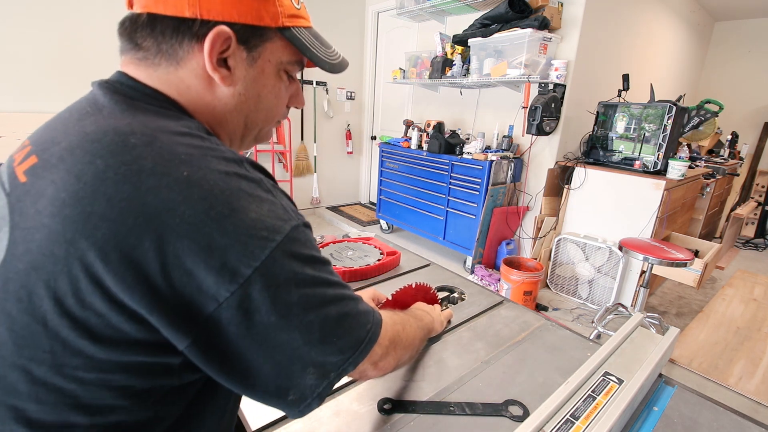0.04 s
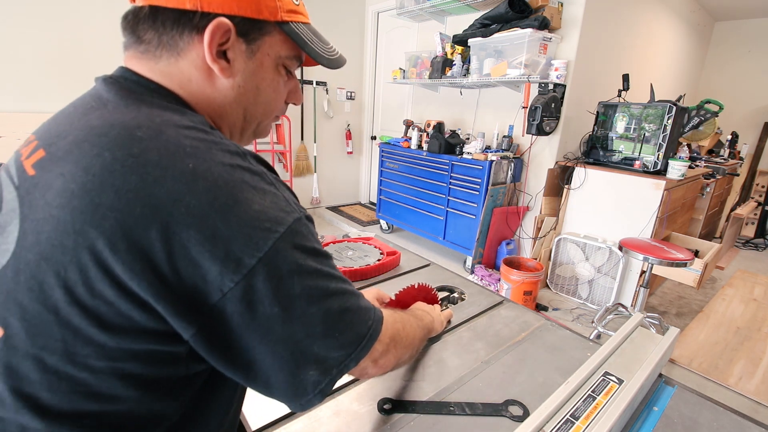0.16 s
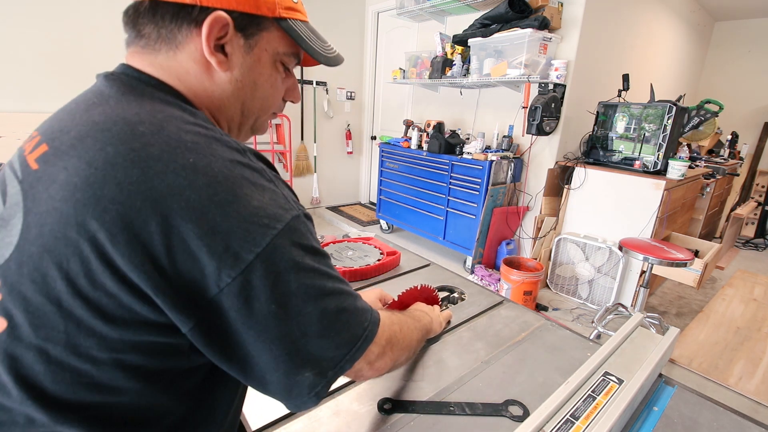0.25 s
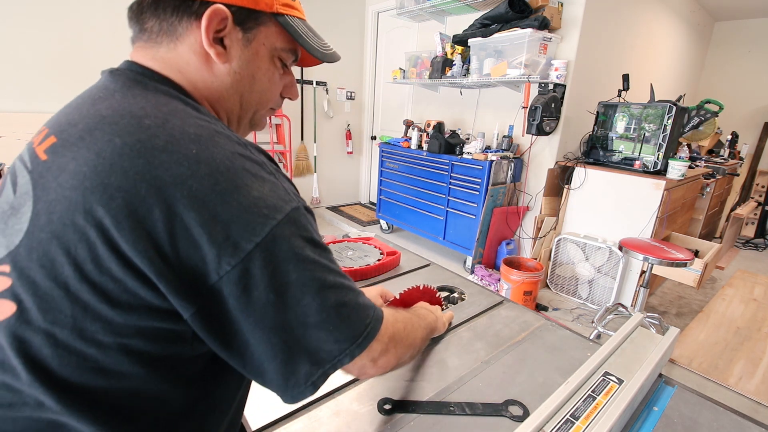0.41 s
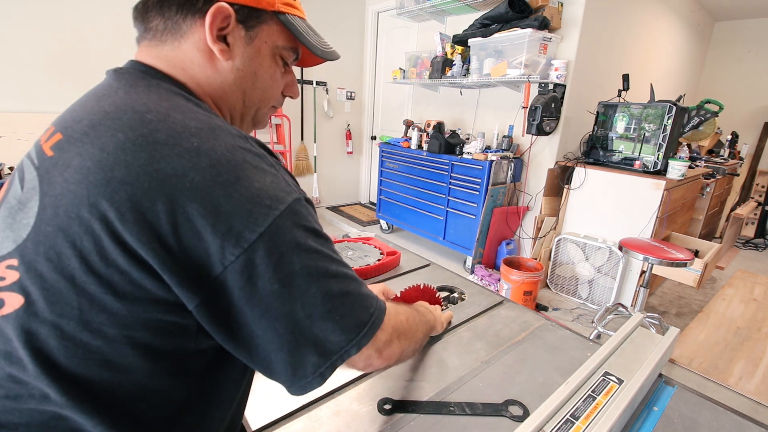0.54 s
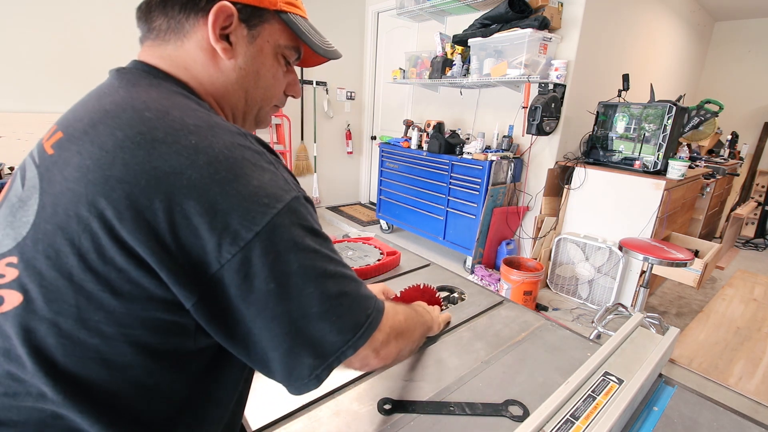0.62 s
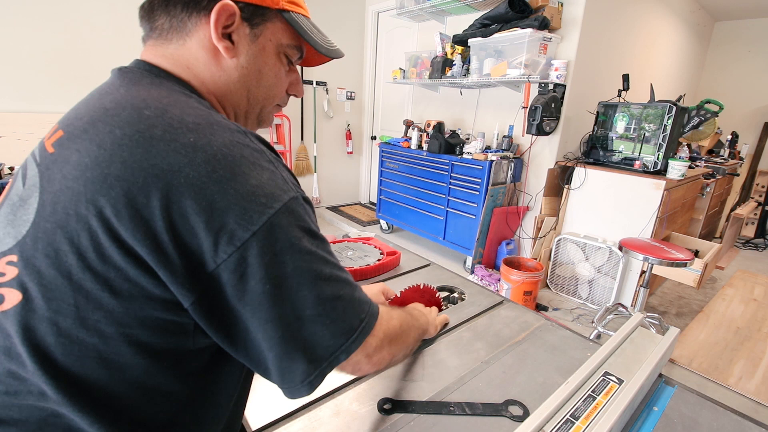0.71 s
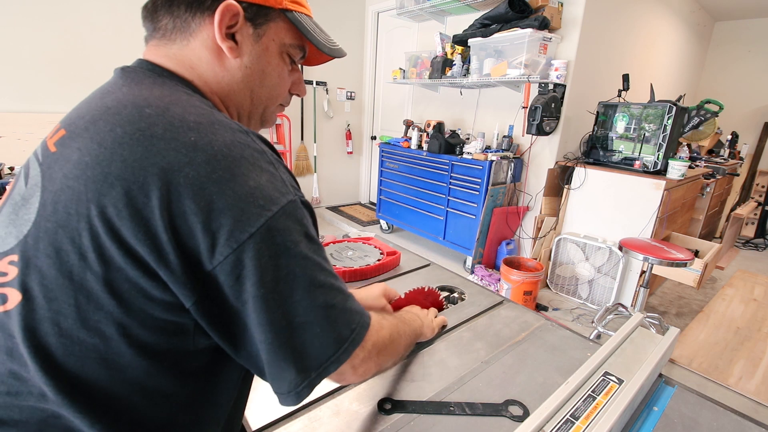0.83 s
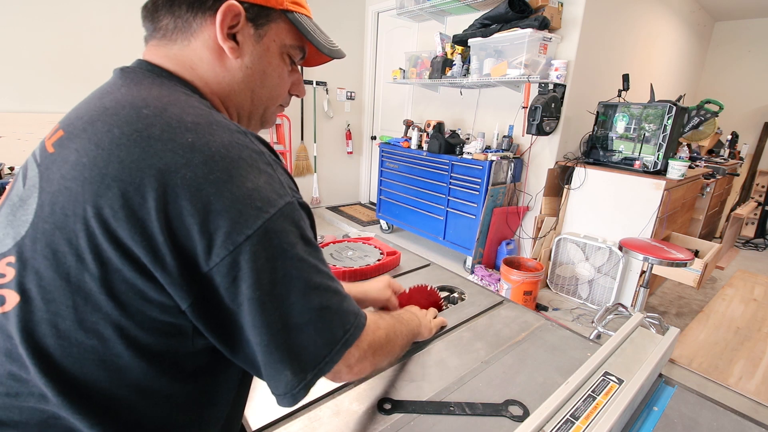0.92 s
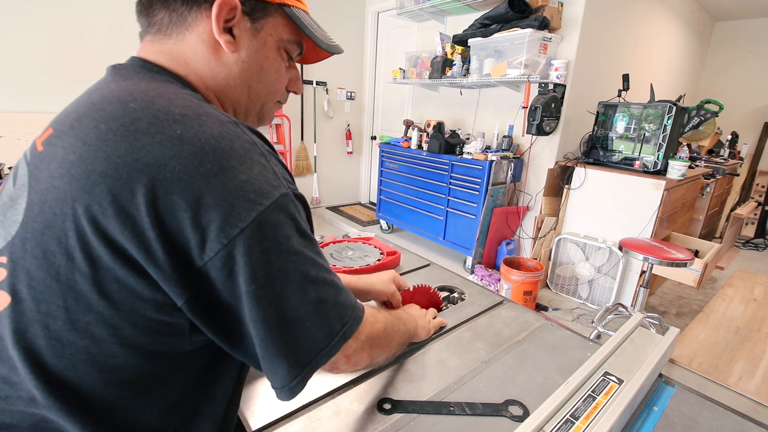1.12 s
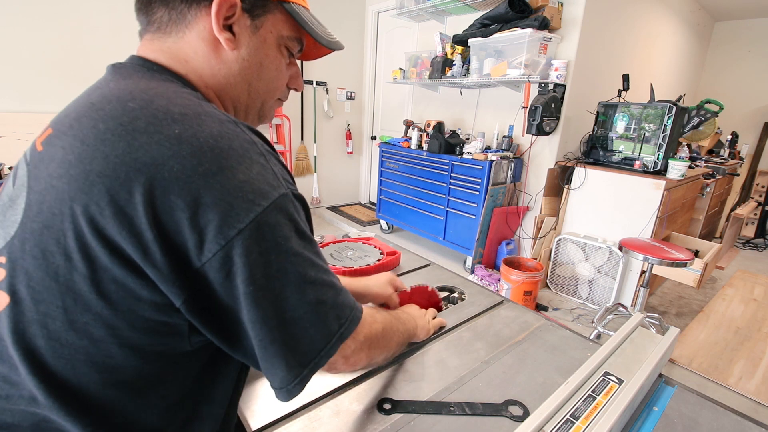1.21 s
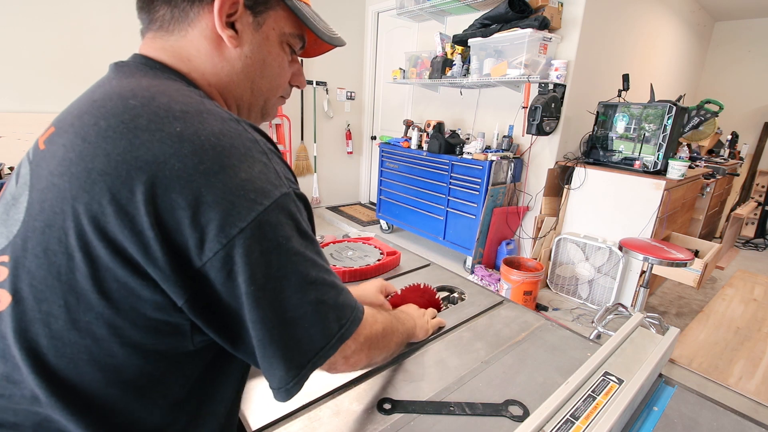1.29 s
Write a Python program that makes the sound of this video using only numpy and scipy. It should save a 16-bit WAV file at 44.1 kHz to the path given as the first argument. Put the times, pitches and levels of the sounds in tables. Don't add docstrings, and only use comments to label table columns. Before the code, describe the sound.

Metallic clank and rattle of steel blades being fitted by hand, with short rings and light scraping

```python
import sys
import numpy as np
from scipy import signal
from scipy.fft import rfft, irfft, next_fast_len
from scipy.io import wavfile
from scipy.ndimage import map_coordinates

SR = 44100
rng = np.random.default_rng(int(sys.argv[2]) if len(sys.argv) > 2 else 0)


def pcm_store(signal):
    levels = np.round(np.clip(np.atleast_2d(signal), -1, 1) * 32767)
    wavfile.write(sys.argv[1], SR, levels.astype(np.int16).T)


def level_to_linear(level):
    exponent = np.asarray(level, float) / 20
    return 10 ** exponent


N = 59535


def unit(x):
    return x / np.sqrt(np.mean(x ** 2) + 1e-20)


def along(points, hz):
    point_hz, value = np.transpose(points)
    return np.interp(np.log(hz + 1), np.log(point_hz + 1), value)


def filtered(x, response):
    size = next_fast_len(len(x) + SR // 2)
    hz = np.fft.rfftfreq(size, 1 / SR)
    return irfft(rfft(x, size) * response(hz), size)[:len(x)]


def coloured_noise(colour, size):
    return filtered(rng.standard_normal(size), lambda hz: level_to_linear(along(colour, hz)))


def wobble(rate_hz, size):
    knots = rng.standard_normal(int(size * rate_hz / SR) + 4)
    return map_coordinates(knots, [np.arange(size) * rate_hz / SR])


def garage(x):
    # (frequency [Hz], decay t60 [s])
    wall_t60 = [(100, 0.71), (500, 0.46), (2000, 0.52), (5000, 0.5), (9000, 0.46), (15000, 0.38)]
    # (frequency [Hz], level [dB])
    wall_colour = [(100, 14), (1000, 3), (5000, 1.5), (7500, -7), (15000, -5)]
    first_wall_s, build_s = .006, .015
    hz, t, spectrum = signal.stft(rng.standard_normal(SR), SR, nperseg=256)
    decay_db = along(wall_colour, hz)[:, None] - 60 * t / along(wall_t60, hz)[:, None]
    tail = signal.istft(spectrum * level_to_linear(decay_db), SR, nperseg=256)[1]
    since_s = np.clip(np.arange(len(tail)) / SR - first_wall_s, 0, None)
    tail = tail * (1 - np.exp(-since_s / build_s))
    return signal.fftconvolve(x, tail / np.linalg.norm(tail))


def contact(body, modes, ring_db, bright_db, chatter_s, rise_s):
    pivot_hz, thump_cut_hz = 2000, 120
    grit_db, scatter_db, grip_detune = 3, 1.5, .006
    soft_ring_db, hard_s = -6, .001
    t = np.arange(18000) / SR
    rise = 1 - np.exp(-t / rise_s)

    def tilt_db(hz):
        return bright_db * np.log2((hz + 50) / pivot_hz)

    noise = filtered(rng.standard_normal(len(t)), lambda f: level_to_linear(along(body, f) + tilt_db(f)))
    shape = level_to_linear(-60 * t / chatter_s) * rise
    chatter = noise * shape * level_to_linear(grit_db * np.clip(wobble(861, len(t)), -2, 2))
    chatter = chatter * np.linalg.norm(shape) / np.linalg.norm(chatter)
    chatter = filtered(chatter, lambda f: (1j * f / (thump_cut_hz + 1j * f)) ** 2)

    hz, db, t60 = np.transpose(modes)[..., None]
    strength, phase, detune = rng.standard_normal((3, len(modes), 1))
    mode_amp = level_to_linear(db + tilt_db(hz) + scatter_db * strength - 60 * t / t60)
    mode_hz = hz * (1 + grip_detune * detune)
    ring = (mode_amp * np.sin(2 * np.pi * mode_hz * t + 2 * phase)).sum(0)
    softness_db = soft_ring_db * np.log10(1 + rise_s / hard_s)
    return np.array([chatter, level_to_linear(ring_db - 17.5 + softness_db) * rise * ring])


def steel(contacts, body, modes, ring_db):
    garage_db, ring_to_walls_db = -3, -5
    out = np.zeros(N + 2 * SR)
    for s, db, *manner in contacts:
        chatter, ring = level_to_linear(db) * contact(body, modes, ring_db, *manner)
        far = level_to_linear(garage_db) * garage(chatter + level_to_linear(ring_to_walls_db) * ring)
        start = round(s * SR)
        out[start:][:len(ring)] += chatter + ring
        out[start:][:len(far)] += far
    return out[:N]


def air():
    # (frequency [Hz], level [dB/Hz])
    air_colour = [(15, -30), (25, -9), (70, -18), (134, -17), (427, -10), (796, -17), (1260, -18.5),
                  (1740, -26), (16000, -44.5)]
    level_db = -56.5
    return level_to_linear(level_db) * unit(coloured_noise(air_colour, N))


def hands():
    # (time [s], bumping level [dB], scraping level [dB])
    moves = [(0, -70, -66.5), (.17, -72, -66), (.215, -54, -67), (.3, -56, -78), (.75, -88, -56.5),
             (0.901, -52, -54.5), (1.0, -48, -52), (1.13, -76, -53), (1.35, -74, -59)]
    # (frequency [Hz], level [dB/Hz])
    bump_colour = [(20, -12), (60, -5), (150, 3.5), (350, 5), (900, -7), (3000, -34), (8000, -70)]
    # (frequency [Hz], level [dB/Hz])
    scrape_colour = [(300, -20), (620, -17), (1000, -1), (1500, 3), (4500, -2), (7000, -15.5), (15000, -17)]
    uneven_db = 3
    s, *levels = np.transpose(moves)
    out = np.zeros(N)
    for colour, db in zip((bump_colour, scrape_colour), levels):
        level_db = np.interp(np.arange(N) / SR, s, db) + uneven_db * wobble(25.95, N)
        out += unit(coloured_noise(colour, N)) * level_to_linear(level_db)
    return out


def tooth_ticks():
    # (time [s], level [dB], brightness [dB/octave], chatter t60 [s], rise [s])
    ticks = [
        (.089, -61, -19, 0.03, 0.0013),
        (.1088, -36.5, -2, 0.043, 0.00014),
    ]
    # (frequency [Hz], level [dB/Hz])
    tooth_body = [(500, -5), (1400, -6), (3000, 3), (6000, 5.5), (12000, -4), (16000, -29)]
    # (frequency [Hz], level [dB], t60 [s])
    tooth_modes = [(1600, -5, .04), (1655, -10, .2), (2205, 0, .07), (3230, -7, .45), (3290, -8, .1),
                   (4020, -22, .15), (5280, -1, .025), (5930, -22, .15), (6380, -19, .2),
                   (10800, -14, .008)]
    return steel(ticks, tooth_body, tooth_modes, ring_db=21)


def squeak():
    start_s, stop_s = .199, .208
    hz, level_db, decay_t60 = 2330, -28, .014
    t = np.arange(N) / SR
    swell = np.clip((t - start_s) / (stop_s - start_s), 0, 1)
    decay = level_to_linear(-60 * np.clip(t - stop_s, 0, 1) / decay_t60)
    return level_to_linear(level_db) * swell * decay * np.sin(2 * np.pi * hz * t)


def blade_clinks():
    # (time [s], level [dB], brightness [dB/octave], chatter t60 [s], rise [s])
    clinks = [
        (.2079, -17, 2.5, .018, .0003),
        (.2108, -11, -.5, .025, .001),
        (.235, -33, -2, .15, .01),
        (.285, -34, -1, .1, .008),
    ]
    # (frequency [Hz], level [dB/Hz])
    blade_body = [(59, -46), (100, -16), (400, -11), (547, -8), (970, -8), (1650, -10), (3250, -12.5),
                  (16000, -36.5)]
    # (frequency [Hz], level [dB], t60 [s])
    blade_modes = [(555, -10, .3), (790, -7, .025), (1110, -7, .08), (1432, -5, .05), (1655, -9, .08),
                   (2205, 0, .04), (2315, -13, .12), (3230, -11, .2), (4020, -17, .08), (4515, -13, .06),
                   (5280, -14, .03), (6750, -12, .02), (7220, -24, .1), (11500, -14, .007)]
    return steel(clinks, blade_body, blade_modes, ring_db=13)


def favoured_modes():
    # (time [s], frequency [Hz], level [dB], swell [s], t60 [s])
    mode_events = [(.2085, 4515, -19, .001, .03), (.209, 5280, -25, .001, .025), (.255, 555, -31, .01, .14),
                   (.29, 2315, -29, .004, 0.058), (.252, 3220, -39, .003, .1),
                   (.4105, 790, -21.5, 0.0017, 0.058), (.405, 2140, -30, 0.0036, 0.056),
                   (0.419, 1065, -24, 0.0018, .04), (.4412, 2193, -10, 0.0009, 0.03),
                   (0.4409, 2378, -13, .001, .05), (.4495, 2250, -14, 0.00087, 0.022),
                   (0.439, 3016, -12, .002, 0.073), (.443, 1535, -19, .003, .1),
                   (.442, 4200, -21, .001, .04), (.446, 5200, -17, .002, .04),
                   (.434, 388, -21.5, 0.0029, 0.074), (.432, 169, -29, 0.0065, 0.076),
                   (.45, 599.3, -16, 0.011, .2), (.472, 1274, -21, .01, .1), (.488, 1030, -21, .004, 0.076),
                   (.505, 1067, -30, .004, 0.097), (.553, 597.5, -24, .008, .14),
                   (.575, 384, -28.5, 0.0065, 0.082), (.212, 159.6, -33, 0.005, 0.075),
                   (.9, 624, -44, 0.0056, .15), (.907, 1480, -38, .002, .05),
                   (.945, 303, -35, 0.0028, 0.047), (.99, 322, -36, .008, 0.099),
                   (1.013, 1515, -33, .001, .09), (1.0136, 1124, -29.5, .001, .05),
                   (1.016, 604, -30, .01, .2), (1.059, 1062, -20, .003, 0.046),
                   (1.069, 3040, -25, .002, .025), (1.073, 1448, -20, 0.0023, 0.055),
                   (1.094, 470, -27.5, .002, 0.046), (1.076, 612, -25, .004, .16),
                   (1.2215, 614, -31, .004, .5), (1.1, 1432, -32, 0.007, 0.16),
                   (1.2225, 1431, -26, .002, .07), (1.245, 1460, -37.5, .006, .15)]
    to_walls_db = -7
    s, hz, db, swell_s, t60 = np.transpose(mode_events)[..., None]
    t = np.clip(np.arange(N) / SR - s, 0, None)
    swell = 1 - np.exp(-t / swell_s)
    near = (level_to_linear(db - 60 * t / t60) * swell * np.sin(2 * np.pi * hz * t)).sum(0)
    return near + level_to_linear(to_walls_db) * garage(near)[:N]


def stack_clatters():
    # (time [s], level [dB], brightness [dB/octave], chatter t60 [s], rise [s])
    clatters = [(.4105, -27, -2.5, .08, .002), (.424, -29, -3, .025, .001), (.4296, -15, 5, .06, .0004),
                (.4408, -11, .5, .06, .001), (.4495, -13, .5, .05, .001), (.446, -16, 4, .03, .001),
                (.4545, -20, 4, .02, .001), (.462, -16, -1, .07, .001), (.475, -16, -2, .09, .002),
                (.487, -14, -1, .09, .002), (.497, -18, 0, .07, .001), (.52, -21, -1, .1, .002),
                (.555, -24, -1, .1, .003)]
    # (frequency [Hz], level [dB/Hz])
    stack_body = [(59, -56), (100, -29), (513, -16), (595, -13.5), (721, -13.5), (1250, -5.5), (1870, -9.5),
                  (4980, -13), (16000, -33)]
    # (frequency [Hz], level [dB], t60 [s])
    stack_modes = [(390, -10, .1), (468, -11, .1), (601, -3, .22), (1070, -8, .1), (1278, -4, .14),
                   (1465, -7, .12), (1533, -6, .12), (2202, -4, .05), (2378, -4, .06), (3006, -8, .07),
                   (3650, -11, .1), (4500, -14, .05), (5200, -10, .07), (7700, -18, .03)]
    return steel(clatters, stack_body, stack_modes, ring_db=8)


def stack_settles():
    # (time [s], level [dB], brightness [dB/octave], chatter t60 [s], rise [s])
    settles = [(.897, -43.5, -3.2, 0.19, 0.005), (.943, -41, -9, 0.045, 0.0036),
               (1.022, -31, -2.5, 0.22, 0.0029), (1.0122, -26, 0, 0.06, 0.0006),
               (1.0542, -25.5, 2, 0.071, 0.00042), (1.061, -22, 0.5, 0.03, 0.0015),
               (1.067, -31.5, 6, 0.034, 0.0011), (1.0715, -21, -.5, 0.069, .002),
               (1.2205, -24.5, -1, 0.066, .002), (1.2152, -30.5, 2, 0.047, .001),
               (1.093, -29, -5, 0.079, 0.0047), (1.24, -38.5, 4, 0.11, 0.0047)]
    # (frequency [Hz], level [dB/Hz])
    shaft_body = [(59, -23), (100, -19), (230, -15), (461, -9.5), (502, -11.5), (583, -3.5), (736, -6),
                  (2990, -10.5), (16000, -36)]
    # (frequency [Hz], level [dB], t60 [s])
    shaft_modes = [(395, -13, .1), (468, -9, .12), (565, -9, .1), (615, -12, .3), (750, -10, .08),
                   (1062, -6, .1), (1278, -10, .12), (1440, -3, .09), (1515, -6, .09), (2230, -11, .07),
                   (3000, -13, .04), (3365, -13, .08), (4560, -17, .06), (7700, -20, .02)]
    return steel(settles, shaft_body, shaft_modes, ring_db=9)


def scene():
    background = air() + hands()
    blade = tooth_ticks() + squeak() + blade_clinks()
    stack = stack_clatters() + stack_settles()
    return (background + blade + stack + favoured_modes())[None]


def low_pass(x):
    return signal.sosfilt(signal.butter(12, 16810, fs=SR, output="sos"), x)


def record(dry):
    top_hz = 15750
    mix = filtered(dry[0], lambda hz: 1 / np.sqrt(1 + (hz / top_hz) ** 80))[None]
    return low_pass(mix)


dry = scene()
out = record(dry)
pcm_store(out)
```